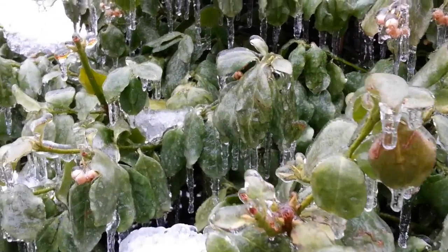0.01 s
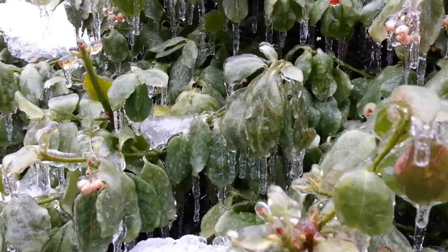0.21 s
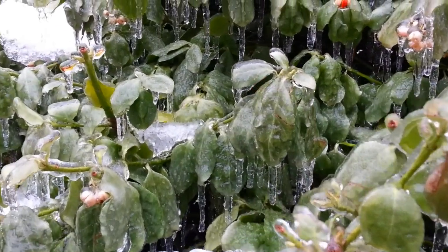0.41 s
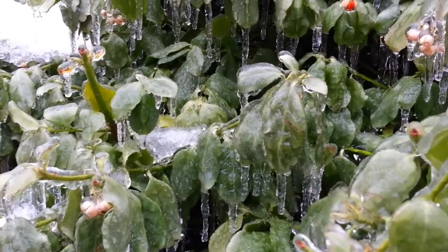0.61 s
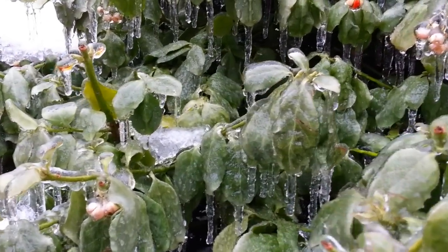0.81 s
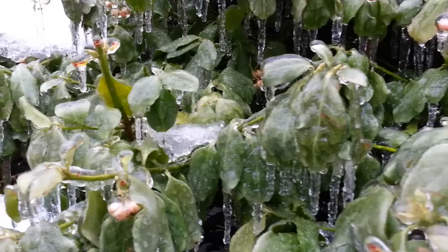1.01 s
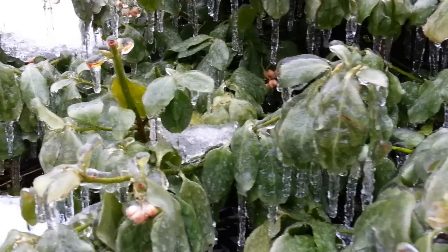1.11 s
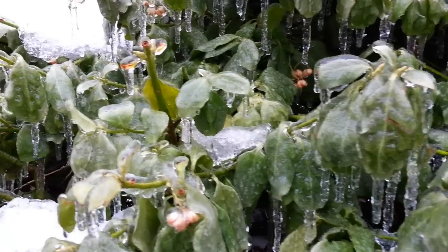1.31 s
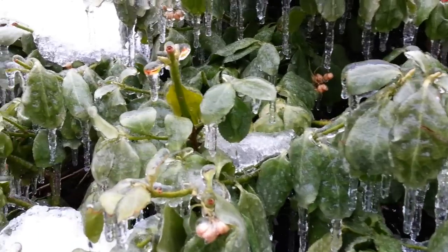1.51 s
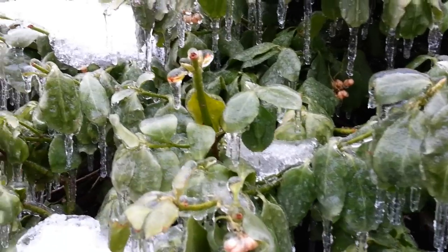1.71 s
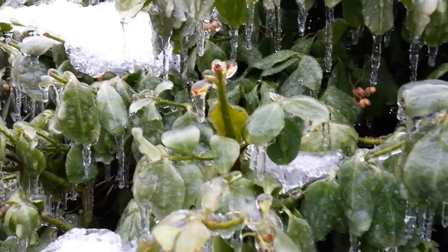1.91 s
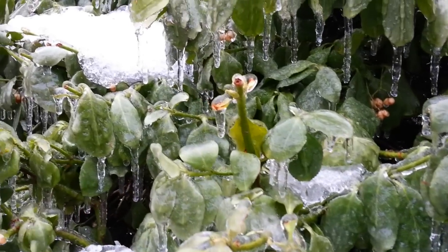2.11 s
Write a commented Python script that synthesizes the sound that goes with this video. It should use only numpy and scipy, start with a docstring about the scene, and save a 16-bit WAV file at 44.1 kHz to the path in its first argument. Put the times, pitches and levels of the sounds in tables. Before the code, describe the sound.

Close, dry cracking of glaze ice on leaves and twigs: quickening snaps burst into a woody crunch, crumbs trickle, a smaller crisp break follows with clinking chips, then near quiet with soft outdoor rumble and hiss.

```python
"""In a frozen shrub outdoors, glaze ice breaks off twigs and leaves close to the microphone.
Single snaps are noise cracks with damped modes of shell, leaf and twig; crunches are dense random clicks.
Falling chips are short bands of noise with a faint clink, and the foliage scatters all three as an echo.
Fine ice rustles in clumps of clicks, over filtered noise: a faint rumble, a hiss and a thin whine."""
import sys
import numpy as np
from scipy import signal
from scipy.fft import rfft, irfft, next_fast_len
from scipy.io import wavfile
from scipy.ndimage import map_coordinates

SR = 44100
rng = np.random.default_rng(int(sys.argv[2]) if len(sys.argv) > 2 else 0)


def transcribe(u):
    """Save the signal u as a 16-bit wav file named by the first command-line argument.

    u: samples, shape (n,) or (channels, n), limited to [-1, 1]; the rate is SR.
    q: integer samples, one column per channel.
    """
    v = np.clip(np.atleast_2d(u).T, -1, 1)
    q = np.round(v * 32767).astype(np.int16)
    wavfile.write(sys.argv[1], SR, q)


N = 97020
M = next_fast_len(N + SR // 2)  # transform length, padded for filter tails
FREQ = np.fft.rfftfreq(M, 1 / SR)
TIME = np.arange(N) / SR
SHORT = TIME[:SR // 12]  # time axis of a single event

# Spectrum of fracturing ice. Each row: frequency in Hz, relative level in dB.
CRACK_SPECTRUM = [(100, -8.5), (900, -8), (1400, -3), (2200, 3), (3000, -2), (5000, -3.5), (7500, -1.5),
                  (10000, -2), (14500, -10)]


def amp(db):
    """A level in decibels is 20 times the decimal logarithm of the gain."""
    return 10 ** (np.asarray(db) / 20)


def unit(x):
    """Dividing by the root mean square gives a signal unit effective value."""
    return x / np.sqrt(np.mean(x ** 2) + 1e-20)


def along(points, hz):
    """A curve of (Hz, value) points is read on a logarithmic frequency axis."""
    point_hz, value = np.transpose(points)
    return np.interp(np.log(hz + 1), np.log(point_hz), value)


def fade(t, t60):
    """Exponential decay falls by 60 dB in the time t60."""
    return np.exp(-np.log(1000) * t / t60)


def filtered(x, response):
    """A linear filter multiplies the spectrum by its frequency response."""
    return irfft(rfft(x, M) * response, M)[..., :N]


def coloured(x, points):
    """A minimum-phase filter through (Hz, dB) points follows from a causal cepstrum."""
    cepstrum = irfft(np.log(amp(along(points, FREQ))), M)
    cepstrum[1:M // 2] *= 2
    cepstrum[M // 2 + 1:] = 0
    return filtered(x, np.exp(rfft(cepstrum)))


def noise(points):
    """Two independent noises, shaped by one spectrum, form a diffuse sound."""
    return unit(coloured(rng.standard_normal((2, N)), points))


def grains(per_s, spread_db):
    """Random impulses of uneven size reach the two ports with independent strengths."""
    struck = rng.random(N) < per_s / SR
    size = struck * amp(spread_db * np.clip(rng.standard_normal(N), -2, 2))
    return unit(size * rng.standard_normal((2, N)))


def add(track, s, sound):
    """By superposition, a sound starting at s seconds sums into the track."""
    i = max(round(s * SR), 0)
    track[..., i:i + sound.shape[-1]] += sound[..., :N - i]


def ring(hz, t60):
    """A damped mode is a sine under exponential decay."""
    return np.sin(2 * np.pi * hz * SHORT) * fade(SHORT, t60)


def burst(carrier, t60):
    """A fast rise and exponential decay shape a carrier; the envelope fixes each channel's energy."""
    attack_s = 0.00023
    shape = fade(SHORT, t60) * (1 - np.exp(-SHORT / attack_s))
    x = carrier * shape
    return x * np.linalg.norm(shape) / np.linalg.norm(x, axis=1, keepdims=True)


def from_right(x):
    """Interchannel delay places a mono sound: it reaches the left port later."""
    left_lag_s = 0.00008
    half_lags = np.array([[-1], [1]])  # left half a lag late, right half a lag early
    return filtered(x, np.exp(np.pi * 1j * FREQ * left_lag_s * half_lags))


def snaps():
    """Each fracture emits a broadband crack and excites damped modes of shell, leaf and twig."""
    # Each row: start in seconds, knock pitch in Hz, knock level in dB,
    # shell clack pitch in Hz, clack level in dB, crack level in dB.
    fractures = [(0.2266, 435, -20, 1530, -9.5, -16.5), (0.3278, 566, -8, 1500, -1, -16.5),
                 (0.3934, 444, 1.5, 1380, -5, -14.5), (0.4322, 600, -11.5, 1100, -10.5, -23),
                 (0.4340, 600, -19.5, 1190, -22, -45), (0.4735, 600, -21.5, 1560, -23.5, -24),
                 (.4950, 715, -7, 1430, -11.5, -10), (0.5006, 760, -17, 1220, -3, -22),
                 (0.5044, 796, 1.5, 1330, -18, -11.5), (0.51, 860, -1, 1380, -1, -9),
                 (0.5146, 860, -2, 2380, -4.5, -17), (0.5196, 710, -8, 1290, -20, -12.5),
                 (0.6555, 750, -22.5, 1490, -30, -30), (0.6702, 790, -12.5, 1370, -18, -18.5),
                 (0.6765, 846, -7.5, 1380, -16, -9), (0.6813, 844, -10, 1420, -13, -15.5),
                 (0.687, 770, -17, 2850, -13, -23.5), (1.1505, 680, -34.5, 1470, -37, -33),
                 (1.2006, 740, -22, 3440, -22, -25), (1.3277, 770, -17, 1470, -10, -15),
                 (1.3376, 770, -9, 1370, -10.5, -14), (1.3515, 710, -7, 2870, -13, -9.5),
                 (1.3597, 690, -14.5, 1140, -24, -28), (1.3627, 680, -16.5, 1350, -8, -18),
                 (1.4597, 610, -15, 1400, -21, -27), (1.4719, 550, -14.5, 1400, -30, -20.5)]
    knock_cycles = 4.3  # cycles until a knock has fallen by 60 dB
    thud_hz, thud_t60_s, crack_t60_s = 231, 0.011, 0.018
    # twig thud relative to a 700 Hz knock; bigger, lower pieces shake the twig more
    thud_db_at_700_hz, thud_db_per_octave = -4, 14.5
    body, cracks = np.zeros(N), np.zeros((2, N))
    bright = noise(CRACK_SPECTRUM)
    for s, hz, knock_db, clack_hz, clack_db, crack_db in fractures:
        knock = amp(knock_db) * ring(hz, knock_cycles / hz)
        thud_db = knock_db + thud_db_at_700_hz + thud_db_per_octave * np.log2(700 / hz)
        thud = amp(thud_db) * ring(thud_hz, thud_t60_s)
        add(body, s, knock + thud + amp(clack_db) * clack(clack_hz))
        carrier = bright[:, round(s * SR):][:, :len(SHORT)]
        add(cracks, s, amp(crack_db) * burst(carrier, crack_t60_s))
    return from_right(body) + cracks


def clack(hz):
    """The ice shell rings in two damped modes, the higher one decaying sooner."""
    t60_s, overtone_ratio, overtone_db = 0.0084, 1.786, -6.5
    overtone = ring(overtone_ratio * hz, t60_s / overtone_ratio)
    return ring(hz, t60_s) - amp(overtone_db) * overtone


def crunches():
    """Dense runs of tiny fractures sum in power: bright splinters over hollow knocking of leaves."""
    # Shells crumbling. Each row: start in seconds, length in seconds before the decay,
    # splinter level in dB, body level in dB.
    crumblings = [(0.203, 0.037, -36, -50.5), (0.4931, 0.018, -18, -19.5), (0.542, 0.015, -36, -31),
                  (0.59, 0.013, -36.5, -41.5), (0.647, 0.0052, -34.5, -35.5), (0.674, 0.01, -25, -35),
                  (1.3257, 0.0078, -25.5, -37), (1.34, 0.025, -20.5, -24), (1.37, 0.011, -29.5, -31),
                  (1.443, 0.02, -35, -39), (1.455, 0.033, -31.5, -33)]
    # Spectrum of the knocking leaves. Each row: frequency in Hz, relative level in dB.
    body_spectrum = [(100, -32), (200, 7.5), (400, -13), (650, -0.5), (880, -2), (1050, -11), (1400, 0),
                     (2100, -18), (5000, -46)]
    attack_s, splinter_t60_s, body_t60_s = 0.00062, 0.087, 0.038
    splinter_power, body_power = np.zeros(N), np.zeros(N)
    for s, length, splinter_db, body_db in crumblings:
        rise = np.clip((TIME - s) / attack_s, 0, 1)
        after = np.maximum(TIME - s - length, 0)
        splinter_power += (amp(splinter_db) * rise * fade(after, splinter_t60_s)) ** 2
        body_power += (amp(body_db) * rise * fade(after, body_t60_s)) ** 2
    fractures = grains(per_s=2200, spread_db=2)
    splinters = np.sqrt(splinter_power) * unit(coloured(fractures, CRACK_SPECTRUM))
    body = np.sqrt(body_power) * unit(coloured(fractures[0], body_spectrum))
    return splinters + from_right(body)


def chips():
    """Impact of a small chip gives a band of noise and a faint damped mode, pitched by its size."""
    # Each row: start in seconds, level in dB, pitch in Hz.
    landings = [(0.124, -33, 2890), (0.2048, -17, 7520), (0.3807, -30, 6000), (0.5923, -18, 3980),
                (0.808, -27.5, 7150), (0.8948, -32, 5500), (0.993, -27, 5500), (1.071, -28, 5400),
                (1.1138, -29.5, 5050), (1.182, -29.5, 5150), (1.3416, -10, 6520), (1.4885, -19, 5840),
                (1.4915, -17, 5420), (1.586, -31.5, 9040), (1.621, -34, 7100), (2.0368, -36, 7270)]
    tick_t60_s, tick_width_octaves = 0.0067, 0.41
    clink_db, clink_t60_s = -12.5, 0.022  # clink level relative to the tick
    out = np.zeros((2, N))
    short_hz = np.fft.rfftfreq(len(SHORT), 1 / SR)
    for s, db, hz in landings:
        octaves_off = np.log2((short_hz + 1) / hz)
        band = np.exp(-.5 * (octaves_off / tick_width_octaves) ** 2)
        white = rng.standard_normal((2, len(SHORT)))
        tick = burst(unit(irfft(rfft(white) * band, len(SHORT))), tick_t60_s)
        clink = amp(clink_db) * ring(hz, clink_t60_s)
        add(out, s, amp(db) * (tick + clink))
    return out


def foliage(x, count=14):
    """Scattering is convolution; each piece breaks at another spot, so each time slice has a new echo."""
    # Spectrum of the echo. Each row: frequency in Hz, level in dB.
    echo_spectrum = [(250, -9.5), (800, -5.5), (1600, -5.5), (4000, 1.5), (14000, 1)]
    out = np.zeros((2, N))
    for part in np.array_split(np.arange(N), count):
        add(out, part[0] / SR, signal.fftconvolve(x[:, part], leaf_echo(), axes=1))
    return coloured(out, echo_spectrum)


def leaf_echo():
    """Dense scattering is decaying noise: the nearest leaves at once, the rest of the shrub as a tail."""
    # Decay of the tail. Each row: frequency in Hz, t60 in seconds.
    tail_decay = [(300, 0.053), (5000, 0.12), (14000, 0.14)]
    tail_db, near_db, near_t60_s = -6.5, -4.5, 0.051
    hz, t, bins = signal.stft(rng.standard_normal((2, SR // 2)), SR, nperseg=256)
    decay = fade(t, along(tail_decay, hz)[:, None])
    tail = signal.istft(bins * decay, SR, nperseg=256)[1]
    near = rng.standard_normal(tail.shape) * fade(np.arange(tail.shape[1]) / SR, near_t60_s)
    tail_part = amp(tail_db) * tail / np.linalg.norm(tail[0])
    return tail_part + amp(near_db) * near / np.linalg.norm(near[0])


def rustle():
    """Friction of iced leaves and trickling crumbs make random impulses in short, ticking clumps."""
    # Each row: time in seconds, level in dB beneath the clumps.
    base_level = [(.07, -63.5), (.15, -45.5), (.29, -48.5), (.55, -35.5), (.8, -47.5), (.99, -44),
                  (1.28, -47.5), (1.64, -48.5), (1.71, -62), (1.87, -54), (2.15, -58.5)]
    # Spectrum of fine ice. Each row: frequency in Hz, relative level in dB.
    fine_spectrum = [(200, -3.5), (700, -3), (1200, 0), (2700, -1.5), (4500, 1), (7000, -1), (10000, 0),
                     (14500, -5.5)]
    clumps_per_s, clump_db = 170, 3  # rate of the random level points, rise per unit deviation
    points = rng.standard_normal(N * clumps_per_s // SR + 2)
    clumps = map_coordinates(points, [TIME * clumps_per_s])  # smooth random curve
    level_db = np.interp(TIME, *np.transpose(base_level)) + clump_db * np.maximum(clumps, 0)
    clicks = grains(per_s=9000, spread_db=0.5)
    return amp(level_db) * unit(coloured(clicks, fine_spectrum))


def outdoors():
    """Filtered noise makes a rumble with soft bumps, mostly alike in both channels, and a steady hiss."""
    # Spectra of the rumble and the hiss. Each row: frequency in Hz, relative level in dB.
    rumble_spectrum = [(20, -59), (32, -19.5), (55, 4), (160, -3), (400, -12), (3000, -50.5),
                       (10000, -35.5)]
    hiss_spectrum = [(300, 12.5), (2700, 6.5), (4200, 3), (7000, 3), (14500, -32)]
    # Soft low bumps in the rumble. Each row: centre in seconds, rise in dB.
    bumps = [(1.459, 14), (1.619, 6), (1.78, 4.5)]
    bump_width_s = 0.014  # standard deviation
    rumble_db, side_db, hiss_db = -48, -12, -57  # side level relative to the middle
    mid, side = noise(rumble_spectrum)
    swell_db = sum(db * np.exp(-.5 * ((TIME - s) / bump_width_s) ** 2) for s, db in bumps)
    signs = np.array([[1], [-1]])
    rumble = (mid + signs * amp(side_db) * side) * amp(rumble_db + swell_db)
    return rumble + amp(hiss_db) * noise(hiss_spectrum)


def whine():
    """Narrow-band noise is heard as a thin, fuzzy tone, here on the left just out of the hiss."""
    centre_hz, width_hz, level_db = 4190, 90, -65
    band = np.exp(-.5 * ((FREQ - centre_hz) / width_hz) ** 2)
    tone = unit(filtered(rng.standard_normal(N), band))
    return amp(level_db) * tone * np.array([[1], [0]])


def scene():
    """Sources superpose: high-passed breaking ice, its scattered echo and the background."""
    low_cut_hz = 308
    high_pass = signal.butter(2, low_cut_hz, "high", fs=SR, output="sos")
    ice = signal.sosfilt(high_pass, snaps() + crunches() + chips())
    return ice + foliage(ice) + rustle() + outdoors() + whine()


def record(dry):
    """Each microphone port filters the sound, soft saturation rounds peaks, and a low-pass limits the band."""
    # Colour of each port. Each row: frequency in Hz, level in dB.
    left_port = [(500, -2.5), (850, 1.5), (1050, -3.5), (1600, -0.5), (2200, -4), (3300, 2), (4600, 5),
                 (6800, -1), (9500, -4), (11500, -8.5), (14000, -25)]
    right_port = [(500, -2.5), (850, 2), (1050, -5), (1600, -4), (2200, -1.5), (3300, -4), (5200, -1),
                  (7000, 7.5), (9000, -2), (11500, -3.5), (14000, -4.5)]
    ceiling, top_hz = 0.67, 14900  # ceiling as a fraction of full scale
    x = np.array([coloured(dry[0], left_port), coloured(dry[1], right_port)])
    x = x / (1 + (x / ceiling) ** 4) ** (1 / 4)
    return filtered(x, 1 / np.sqrt(1 + (FREQ / top_hz) ** 160))  # very steep low-pass


dry = scene()
out = record(dry)
transcribe(out)
```